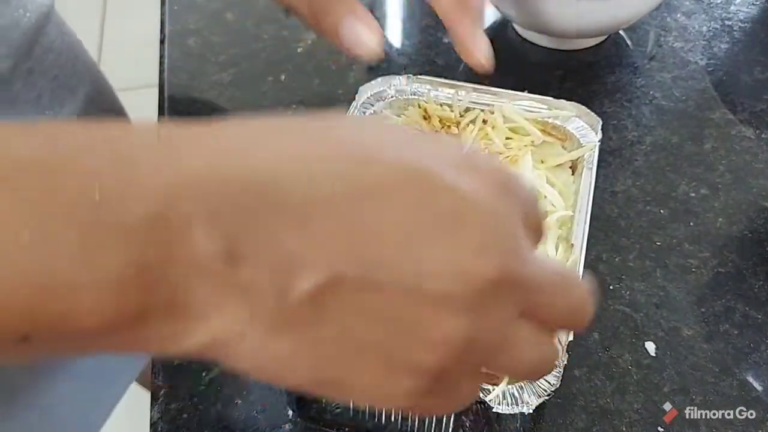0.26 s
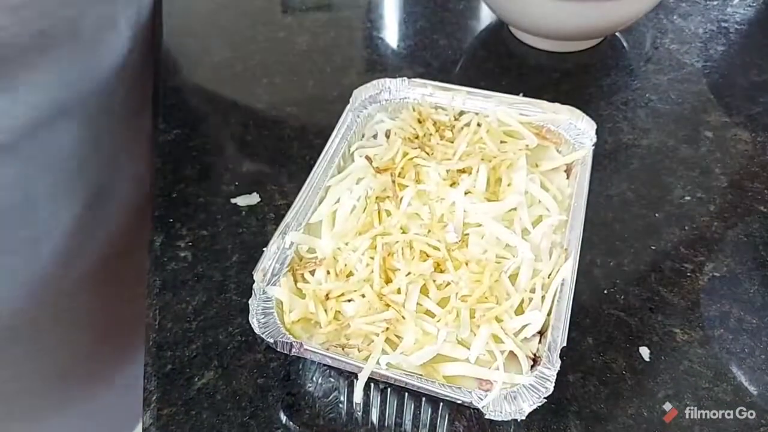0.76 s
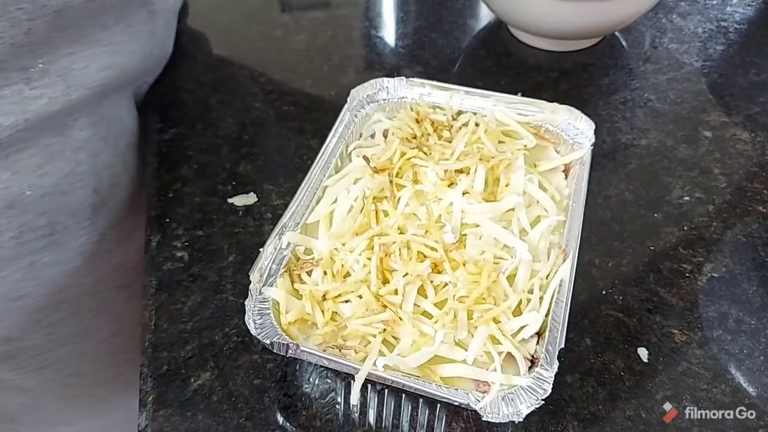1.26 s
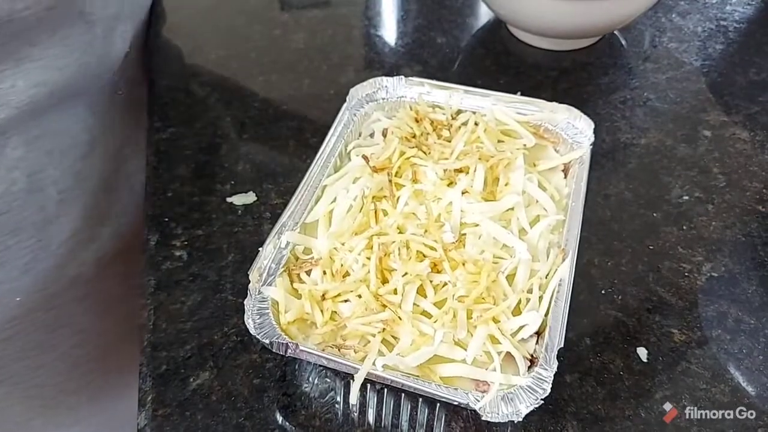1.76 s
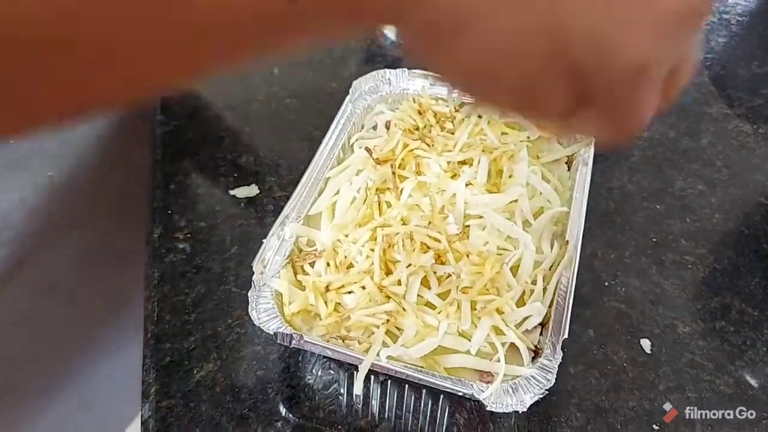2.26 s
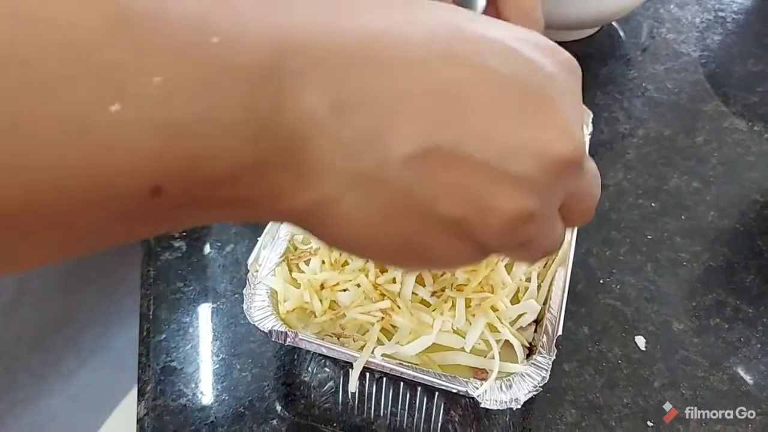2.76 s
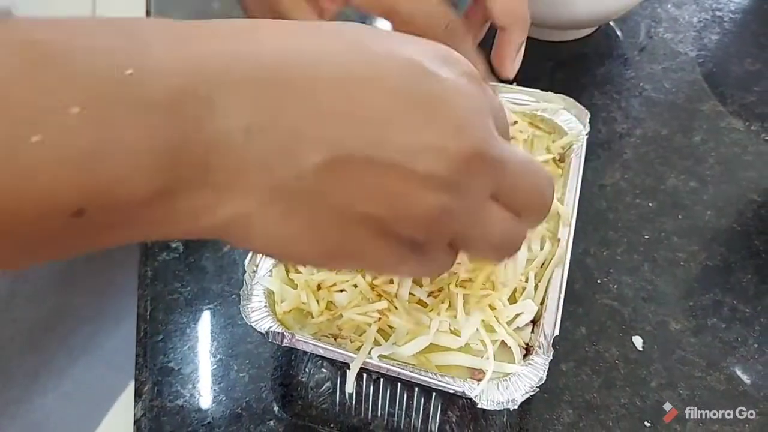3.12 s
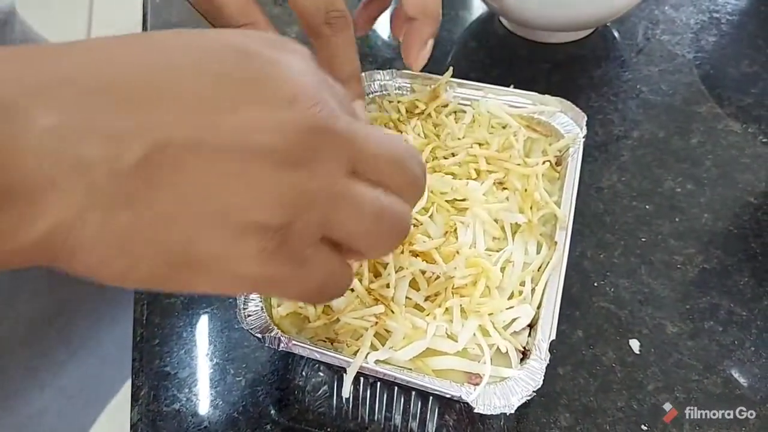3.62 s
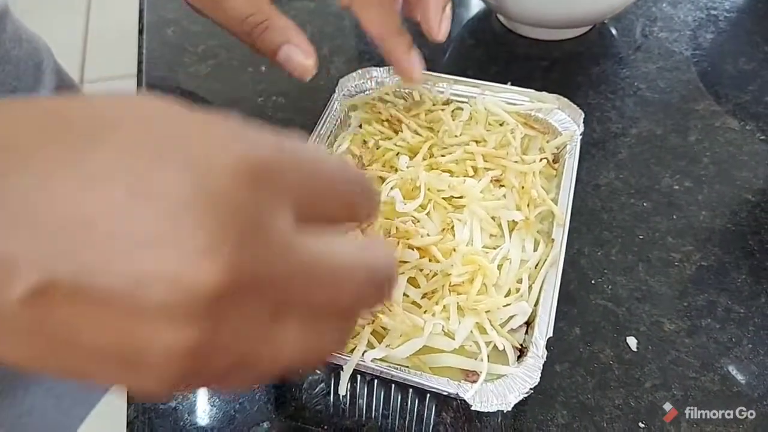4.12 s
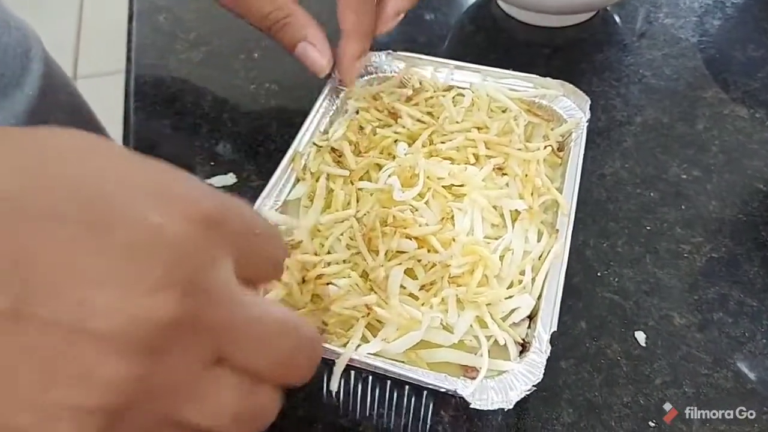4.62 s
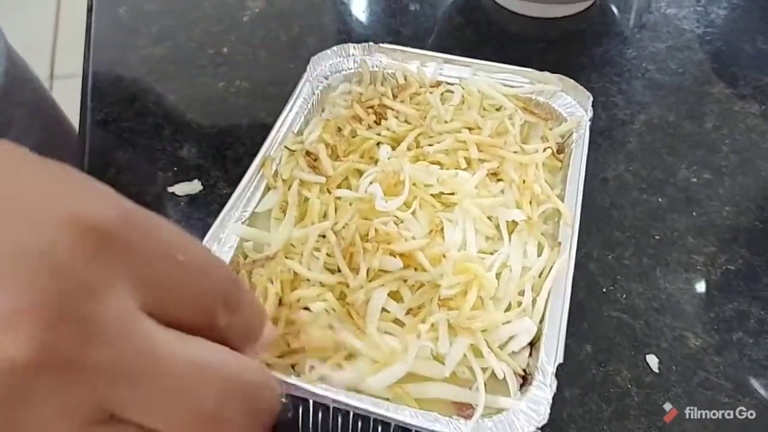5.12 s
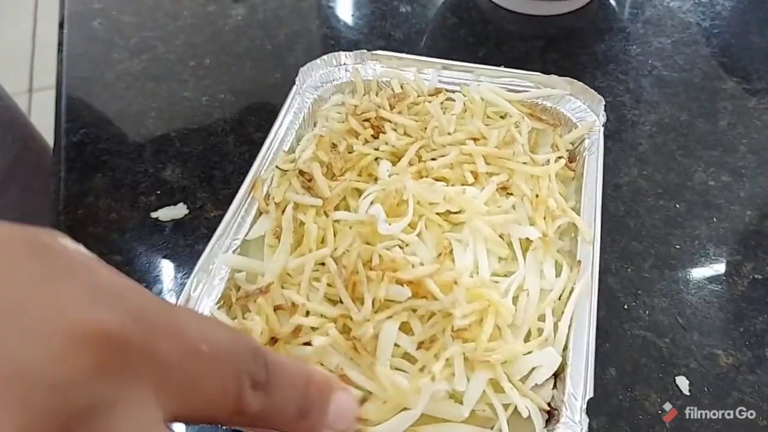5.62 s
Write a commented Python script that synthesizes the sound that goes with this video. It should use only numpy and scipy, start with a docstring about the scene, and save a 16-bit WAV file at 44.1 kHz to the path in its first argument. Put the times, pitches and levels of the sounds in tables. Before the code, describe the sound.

Crisp potato sticks crackle and snap in a foil tray, with a loud metal door bang early on and a steady low hum.

```python
"""Crisp potato sticks fracture as fingers spread them in a foil tray on a stone kitchen counter; each
snap excites the tray's resonances, and the foil pops as it flexes. A sheet-metal door, like an oven's,
swings and bangs shut: its panel modes ring and the tiled room reverberates. An appliance hums, a bird
chirps outside, something hoots faintly, and automatic gain control lowers the level after the bang."""
import sys
import numpy as np
from scipy import signal
from scipy.fft import rfft, irfft
from scipy.io import wavfile
from scipy.ndimage import uniform_filter1d

SR = 44100
rng = np.random.default_rng(int(sys.argv[2]) if len(sys.argv) > 2 else 0)


def pcm_store(signal):
    """Save signal as 16-bit PCM."""
    levels = np.round(np.clip(np.atleast_2d(signal), -1, 1) * 32767)
    wavfile.write(sys.argv[1], SR, levels.astype(np.int16).T)


N = 259249
TIME = np.arange(N) / SR

# Diffuse-field coherence of the two microphones. Each row: frequency in Hz, coherence from 0 to 1.
COHERENCE = [(30, .45), (70, .5), (150, .97), (490, .94), (750, .55), (1300, .2), (3000, .1), (8000, 0)]
# Stereo balance of the room. Each row: frequency in Hz, left minus right in dB.
ROOM_BALANCE = [(60, -11), (400, 0.5), (800, -1), (1100, 1.5), (2400, -4), (4600, -6), (6100, -10),
                (7600, 7.5), (11000, 1)]
# Reverberation time. Each row: frequency in Hz, seconds to fall by 60 dB.
ROOM_T60 = [(100, 1), (400, 1), (800, 1), (2500, 0.84), (5000, 0.86), (9000, 0.6), (15000, 0.43)]


def amp(db):
    """Amplitude ratio: tenfold for every 20 dB."""
    return 10 ** (np.asarray(db) / 20)


def unit(x):
    """Normalisation to rms 1."""
    return x / np.sqrt(np.mean(x ** 2) + 1e-20)


def curve(points, hz):
    """Linear interpolation over log frequency."""
    f, value = np.transpose(points)
    return np.interp(np.log(hz + 1), np.log(f + 1), value)


def resonances(table, f):
    """Lorentzian peaks and dips, summed in dB."""
    return sum(db / (1 + (2 * (f - hz) / width) ** 2) for hz, width, db in table)


def sides(balance, hz):
    """Level-difference panning: left and right gains at a frequency."""
    return amp(np.array([[.5], [-.5]]) * curve(balance, hz))


def placed(pair, balance):
    """Level-difference panning of every frequency in a signal."""
    hz = np.fft.rfftfreq(pair.shape[1], 1 / SR)
    return irfft(rfft(pair) * sides(balance, hz), pair.shape[1])


def add(mix, start_s, sound):
    """Superposition of a sound on the mix."""
    part = mix[:, max(round(start_s * SR), 0):][:, :sound.shape[1]]
    part += sound[:, :part.shape[1]]


def colour(x, gain_db, size=4096):
    """Minimum-phase filtering; gain_db is a function of frequency."""
    log_gain = np.log(amp(gain_db(abs(np.fft.fftfreq(size, 1 / SR)))))
    taps = np.fft.ifft(np.exp(np.conj(signal.hilbert(log_gain)))).real
    return signal.fftconvolve(x, taps[None, :size // 2], axes=1)[:, :x.shape[1]]


def drift(cutoff_hz):
    """Low-pass noise: a smooth random wander of rms 1."""
    spectrum = rfft(rng.standard_normal(N)) * (np.fft.rfftfreq(N, 1 / SR) < cutoff_hz)
    return unit(irfft(spectrum, N))


def damped_mode(hz, decay_s, size=8192):
    """Radiation from a heavily damped mode: air carries its rate of change, so no net push remains."""
    t = np.arange(size) / SR
    motion = np.sin(2 * np.pi * hz * t) * np.exp(-t / decay_s) * (1 - np.exp(-2 * hz * t))
    return np.gradient(motion) * SR / (2 * np.pi * hz)


def diffuse_noise(size, balance=ROOM_BALANCE):
    """A diffuse field is alike at both microphones in the bass and incoherent in the treble."""
    mid, side = rfft(rng.standard_normal((2, size)))
    coherence = curve(COHERENCE, np.fft.rfftfreq(size, 1 / SR))
    mid, side = np.sqrt(1 + coherence) * mid, np.sqrt(1 - coherence) * side
    return placed(irfft(np.array([mid + side, mid - side]), size), balance)


def kitchen(x, build_s=0.0069):
    """Reverberation: dense reflections off tile and stone decay exponentially, each band at its rate."""
    hz, t, spectra = signal.stft(diffuse_noise(SR), SR, nperseg=256)
    decay = 10 ** (-3 * t / curve(ROOM_T60, hz)[:, None])
    tail = signal.istft(spectra * decay, SR, nperseg=256)[1]
    tail *= 1 - np.exp(-np.arange(tail.shape[1]) / SR / build_s)
    return signal.fftconvolve(x, unit(tail) / np.sqrt(tail.shape[1]), axes=1)[:, :N]


def appliance(air_db=-53, throb=0.034, sway_rad=0.33, sway_rad_per_hz=0.000087):
    """A line spectrum from motor and mains, modulated in phase and amplitude, over a rush of air."""
    # Hum lines and the air's spectrum. Each row: frequency in Hz, relative level in dB.
    hum_lines = [(60, -89), (77.5, -88.5), (118.8, -65.5), (175.4, -48.5), (240, -56.5), (314.6, -72.5),
                 (480.2, -64.5), (600.3, -71), (660.3, -73), (720.4, -72), (2073, -83.5), (2164, -73),
                 (2810, -73), (3182, -79.5)]
    air_spectrum = [(15, -45), (25, -25), (64, -3), (120, -18), (149, -12), (175, -11.5), (256, -14),
                    (293, -16), (427, -17.5), (476, -18.5), (545, -16.5), (1190, -20.5), (2840, -23.5),
                    (11000, -40.5), (16000, -51)]
    # Each row: frequency in Hz, left minus right in dB.
    balance = [(60, 0), (110, -12.5), (200, 1.5), (480, 3), (650, -5.5), (1290, -1.5), (2380, -4.5),
               (3000, -4), (4600, -12), (6100, -10), (7500, 8.5), (9500, 3.5), (13000, 2)]
    whine = [(2810, 110, 8)]  # centre in Hz, width in Hz, gain in dB
    air = colour(diffuse_noise(N, balance), lambda f: curve(air_spectrum, f) + resonances(whine, f))
    out = amp(air_db) * unit(air)
    wander, swell = drift(3.7), drift(9.6)
    for hz, db in hum_lines:
        shift = rng.integers(N)
        sway = (sway_rad + sway_rad_per_hz * hz) * np.roll(wander, shift)
        phase = 2 * np.pi * (hz * TIME + rng.random()) + sway
        envelope = np.sqrt(2) * amp(db) * (1 + throb * np.roll(swell, shift))
        out += sides(balance, hz) * envelope * np.sin(phase)
    return out


def bird(trill_hz=170, waver_hz=95, far_stretch=1.83):
    """Rapid frequency modulation turns gliding tones into buzzy chirps."""
    # One phrase, highest syllable first. Each row: offset in seconds, length in seconds,
    # first and last pitch in Hz, trill depth in Hz, relative level in dB.
    syllables = [(0.002, 0.078, 5680, 5540, 240, -3), (-0.017, 0.04, 4715, 4790, 180, -2),
                 (0.0552, 0.086, 4100, 4250, 577, 1.5)]
    # Whole phrases, and far calls of the high syllable alone. Each row: time in seconds, level in dB.
    phrases = [(2.278, -50), (4.217, -47.5)]
    far_calls = [(0.545, -65), (5.55, -61)]
    trill = np.sin(2 * np.pi * trill_hz * TIME + drift(60))
    waver = waver_hz * drift(347)

    def syllable(time_s, level_db, row, stretch=1):
        """One modulated glide under an arched envelope."""
        offset, length, first_hz, last_hz, depth_hz, db = row
        progress = np.clip((TIME - time_s - offset) / (length * stretch), 0, 1)
        hz = first_hz + (last_hz - first_hz) * progress + depth_hz * trill + waver
        arch = 2 * np.sqrt(progress * (1 - progress))
        return amp(level_db + db) * arch * np.sin(2 * np.pi * np.cumsum(hz) / SR)

    song = sum(syllable(s, db, row) for s, db in phrases for row in syllables)
    return song + sum(syllable(s, db, syllables[0], far_stretch) for s, db in far_calls)


def hoot(waver_hz=18):
    """A faint, far tone with random frequency modulation under a half-sine envelope."""
    # Start and end in seconds, pitch in Hz, level in dB.
    note = (4.25, 4.5, 447, -57.5)
    start, end, hz, db = note
    swell = np.sin(np.pi * np.interp(TIME, [start, end], [0, 1]))
    return amp(db) * swell * np.sin(2 * np.pi * np.cumsum(hz + waver_hz * drift(29.5)) / SR)


def outdoors():
    """Indirect transmission: bird and hoot arrive only as the room's reverberation."""
    calls = bird() + hoot()
    return kitchen(np.array([calls, calls]) * np.sqrt(2), build_s=0.005)


def door_swing():
    """Sliding friction: a soft broadband scrape before the door lands."""
    # Each row: time in seconds, level in dB.
    envelope = [(.88, -82), (.97, -70), (1.005, -52), (1.04, -51.5), (1.09, -54), (1.1, -80)]
    # Each row: frequency in Hz, gain in dB.
    spectrum = [(200, 2), (700, 4), (2000, 0), (5000, 0), (9000, -6), (16000, -9)]
    times, db = np.transpose(envelope)
    scrape = colour(diffuse_noise(N), lambda f: curve(spectrum, f))
    return unit(scrape) * np.interp(TIME, times, amp(db), left=0, right=0)


def door_bang(crack_db=-21, crack_s=0.0047, room_db=-16, ring_db=-19.0, ring_rise_s=0.00053, size=4096):
    """Impact excitation: the door lands and rattles; the first blow sets panel and frame ringing."""
    # Each row: start in seconds, relative level in dB.
    blows = [(1.0959, 1.5), (1.0985, -0.5), (1.101, -6), (1.12, -6.5), (1.139, -2.5), (1.149, -7),
             (1.164, -3.5)]
    # Spectrum of a blow. Each row: frequency in Hz, gain in dB.
    spectrum = [(35, -51), (60, -35), (146, -28), (227, -23.5), (268, -22), (492, -14), (579, -12),
                (803, -13), (1310, -19), (2250, -14), (2470, -12.5), (2840, -23.5), (4120, -24),
                (9350, -31), (16000, -45)]
    # Clusters of close panel modes and gaps between them. Each row: centre and width in Hz, gain in dB.
    clusters = [(415, 90, 1), (586, 120, -2), (1090, 130, -2.5), (1430, 150, -0.5), (1600, 230, -0.5),
                (3820, 89, -13), (4090, 180, 8), (4980, 530, -5), (5670, 1100, 2.5)]
    # The panel's modes: frequencies in Hz and, in the same order, relative levels in dB.
    panel_hz = [384, 407, 429, 468, 492.5, 617, 718, 817.5, 1000, 1120, 1214, 1573, 1643, 2075, 2400.5,
                2433, 2472.7, 4029, 4668, 5420, 5884]
    panel_db = [-5.5, -7.5, -3.5, -7, 2, -26, -7, -6, -10, -30, -10.5, -13.5, -14, -14, 1.5, -26, -7.5, -15,
                -20, -28, -32]
    # Damped modes of frame and cabinet. Each row: frequency in Hz, level in dB, decay time in seconds.
    frame_modes = [(85.6, -38, 0.039), (230.2, -32.5, 0.09), (356, -31, 0.01), (430, -7, 0.0053),
                   (976, -20, 0.013), (1644, -11, 0.0043)]
    cracks, impulses = np.zeros((2, 2, N))
    fade = np.exp(-np.arange(size) / SR / crack_s)
    for start, db in blows:
        add(cracks, start, amp(db) * diffuse_noise(size) * fade)
        add(impulses, start, amp(db) * np.ones((2, 1)))
    body = lambda f: curve(spectrum, f) + resonances(clusters, f)
    out = amp(crack_db) * unit(colour(cracks, body))
    out += amp(room_db) * unit(kitchen(colour(impulses, body)))
    out *= np.sqrt(.03 * SR / N)  # crack and room levels count their energy as if within 30 ms
    landing_s, t = blows[0][0], np.arange(SR) / SR
    for hz, db in zip(panel_hz, panel_db):
        # high modes reach the two microphones out of phase
        lag = rng.choice([-1, 1]) * np.arccos(curve(COHERENCE, hz))
        phase = rng.uniform(0, 2 * np.pi) + np.array([[.5], [-.5]]) * lag
        ring_t60 = 0.69 * curve(ROOM_T60, hz)
        envelope = 10 ** (-3 * t / ring_t60) * (1 - np.exp(-t / ring_rise_s))
        ring = envelope * np.sin(2 * np.pi * hz * t + phase)
        add(out, landing_s, amp(db + ring_db) * sides(ROOM_BALANCE, hz) * ring)
    for hz, db, decay_s in frame_modes:
        add(out, landing_s, amp(db) * sides(ROOM_BALANCE, hz) * damped_mode(hz, decay_s))
    return out


def arm_rustle():
    """Band-pass noise swells under a Gaussian envelope as the arm reaches over the tray."""
    # Middle and half length in seconds, centre and half width in Hz, level in dB.
    rustle = (3, 0.63, 311, 98, -59.5)
    middle, half, hz, width, db = rustle
    noise = colour(diffuse_noise(N), lambda f: -20 * np.log10(1 + ((f - hz) / width) ** 2))
    return amp(db) * unit(noise) * np.exp(-((TIME - middle) / half) ** 2)


def foil_pops():
    """Damped free vibration: the tray wall flexes under a finger with a pop or a ping."""
    # Each row: start in seconds, frequency in Hz, level in dB, decay time in seconds.
    flexes = [(3.364, 1550, -56, .012), (3.408, 1410, -46, 0.0082), (4.089, 976, -43, 0.013),
              (4.094, 2290, -39, 0.0079), (4.804, 1560, -44, .006), (5.708, 5900, -33.5, 0.0023)]
    out = np.zeros((2, N))
    for start, hz, db, decay_s in flexes:
        add(out, start, amp(db) * np.ones((2, 1)) * damped_mode(hz, decay_s))
    return out


def stick_timbre(x, body_db, top_db):
    """Resonant filtering: big pieces sound hollow, small ones bright; each adds peaks to the tray's."""
    # Resonances of the filled foil tray. Each row: centre in Hz, width in Hz, gain in dB.
    tray_modes = [(950, 160, 9), (1530, 330, 5.5), (2260, 110, 6.5), (2870, 1200, 1), (5530, 1500, 3),
                  (7440, 540, 5)]
    spectrum = [(250, body_db - 44), (700, body_db - 23), (1200, body_db - 9), (2000, body_db),
                (4000, 0.73), (6000, -3.9), (9500, top_db - 2), (15500, top_db - 10)]
    stick_hz = np.array([1800, 3200, 5600]) * rng.uniform(1, 1.6, size=3)
    stick_modes = [(hz, hz / 6, 2.5) for hz in stick_hz]
    return colour(x, lambda f: curve(spectrum, f) + resonances(tray_modes + stick_modes, f))


def stick_crumbling(cracks_per_s=2500, spread_db=3, top_db=-7, level_db=-6):
    """Shot noise: sticks rub and crumble under the fingers in clumps of tiny cracks, a few larger."""
    # Each row: middle in seconds, half length in seconds, relative level in dB, hollow body in dB.
    presses = [(0.12, 0.039, -59, -5), (2.547, 0.19, -66, 1), (3.293, 0.065, -61, -18),
               (3.376, 0.028, -50, 0), (3.44, 0.079, -55.5, 9), (3.7, 0.015, -52, 2),
               (3.854, 0.0083, -53, -4), (4.097, 0.012, -45, -1.5), (4.15, 0.046, -56.5, -22),
               (4.48, 0.035, -55, -3), (4.72, 0.028, -48, 8), (5.162, 0.052, -55.5, -7),
               (5.733, 0.05, -56, -19)]
    out = np.zeros((2, N))
    sizes = amp(spread_db * np.minimum(rng.exponential(1, N), 4))
    cracks = rng.standard_normal((2, N)) * sizes * (rng.random(N) < cracks_per_s / SR)
    cracks = cracks + .5 * cracks[::-1]  # each side also hears the other
    for middle, half, db, body_db in presses:
        span = np.flatnonzero(abs(TIME - middle) < 2 * half)
        swell = np.exp(-((TIME[span] - middle) / half) ** 2)
        clump = stick_timbre(cracks[:, span] * swell, body_db, top_db)
        add(out, TIME[span[0]], amp(db + level_db) * unit(clump))
    return out


def stick_snaps(level_db=-1.85, decay_s=0.002, body_db_per_doubling=30, echo_db=-25, echo_s=0.018):
    """Brittle fracture: a brief burst, longer in hollow pieces, trailed by echoes off tray and counter.
    Returns the ragged direct bursts in stereo and the clean clicks that spread into the room."""
    # Thick sticks sound hollow, thin ones crisp.
    # Each row: start in seconds, relative level in dB, hollow body in dB, crisp top in dB.
    fractures = [(0.171, -42.5, -7, -35), (0.2793, -38.5, -7, -15), (1.5975, -59, 5, 10),
                 (2.6515, -38.5, -3, -10), (2.692, -31.5, -14, -8), (2.934, -50, 4, -4),
                 (3.207, -42, 10, -35), (3.3577, -41.5, -1, -3), (3.3631, -40, 3, -25),
                 (3.4326, -45, 10, -2), (3.4495, -40.5, -14, -14), (3.462, -36, -4, -9),
                 (3.5045, -38.5, -8, -11), (3.6423, -42, 19, -18), (3.6668, -34, 6, -27),
                 (3.6755, -37, 0, -4), (3.6803, -30, -3, -11), (3.7015, -46, 4, -2), (4.0954, -38.5, 4, -4),
                 (4.1473, -47, -13, 1), (4.2239, -44, 3, 0), (4.4635, -44, -7, -1), (4.5338, -42.5, -4, 1),
                 (4.7006, -38.5, -4, -13), (4.721, -41, -9, -14), (4.7258, -39.5, -6, -5),
                 (4.8006, -40.5, 12, 2), (4.8068, -42.5, 12, -10), (5.153, -40.5, 8, 20),
                 (5.1661, -34, -26, -12), (5.7107, -48, -25, 8), (5.7403, -39.5, -18, -11)]
    out, t = np.zeros((3, N)), np.arange(2048) / SR
    for start, db, body_db, top_db in fractures:
        noise = rng.standard_normal((3, t.size))  # common, left, right
        fade = np.exp(-t / (decay_s * 2 ** (body_db / body_db_per_doubling)))
        echoes = amp(echo_db) * np.exp(-t / echo_s)
        direct = (noise[0] + noise[1:]) * (fade + echoes)
        burst = stick_timbre(np.vstack([direct, t == 0]), body_db, top_db)
        rms_5ms = np.sqrt((burst ** 2).sum(1, keepdims=True) / (.005 * SR))
        add(out, start, burst / rms_5ms * amp(db + level_db))
    return out[:2], out[2:]


def scene(tray_room_db=-8.0):
    """Direct and reverberant fields: the tray is close and fairly dry; all else fills the room."""
    # What the room returns of the tray. Each row: frequency in Hz, gain in dB.
    echo_spectrum = [(1000, -5), (3000, 1.5), (4200, -1.5), (5500, -4.5), (8000, 0), (11000, 2.5),
                     (15000, 2)]
    # Close by, each pitch favours one microphone. Each row: frequency in Hz, left minus right in dB.
    tray_balance = [(800, 4), (1900, 3.5), (2900, 5.5), (3600, -10), (4800, -2.5), (6000, -14), (7200, 5),
                    (9500, 2.5), (14500, 4)]
    snaps, clicks = stick_snaps()
    handling = stick_crumbling() + foil_pops()
    echo = colour(kitchen(clicks + handling), lambda f: curve(echo_spectrum, f))
    tray = placed(snaps + handling, tray_balance) + amp(tray_room_db) * echo
    return tray + arm_rustle() + door_bang() + door_swing() + outdoors() + appliance()


def record(dry, threshold_db=-30, slope=0.28, release_db_per_s=9, attack_s=0.31, cutoff_hz=16250):
    """Automatic gain control: the gain sinks after the bang and creeps back; a low-pass follows."""
    power_db = 10 * np.log10(abs(uniform_filter1d((dry ** 2).mean(0), size=400)) + 1e-12)
    fall_db = TIME * release_db_per_s
    held_db = np.maximum.accumulate(power_db + fall_db) - fall_db  # peak hold with a steady release
    over_db = np.maximum(held_db - threshold_db, 0)
    pole = np.exp(-1 / (attack_s * SR))
    ducked = dry / amp(slope * signal.lfilter([1 - pole], [1, -pole], over_db))
    low_pass = signal.firwin(511, cutoff_hz, window=("kaiser", 9), fs=SR)
    return signal.oaconvolve(ducked, low_pass[None], "same")


dry = scene()
out = record(dry)
pcm_store(out)
```